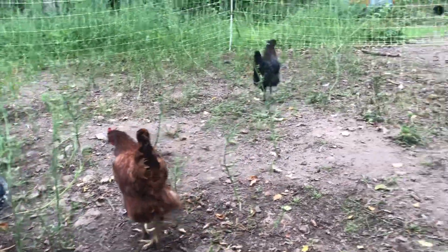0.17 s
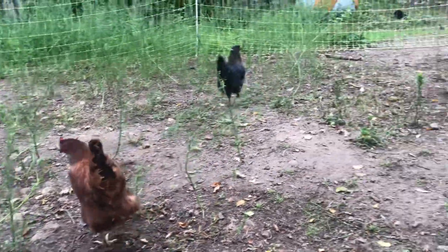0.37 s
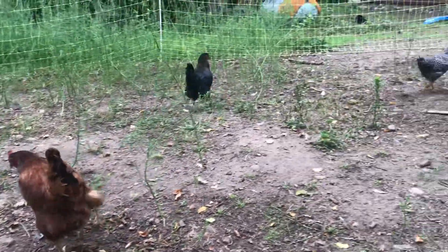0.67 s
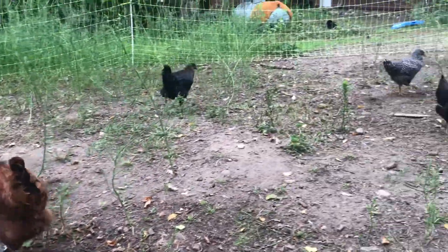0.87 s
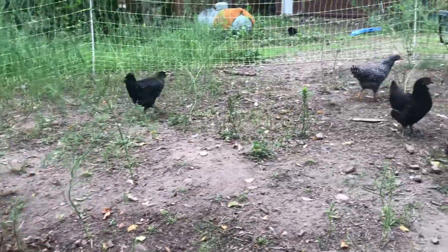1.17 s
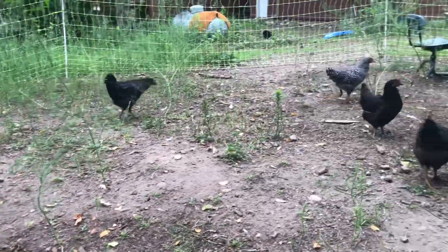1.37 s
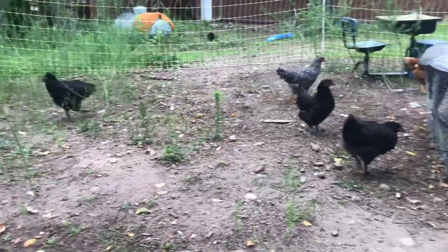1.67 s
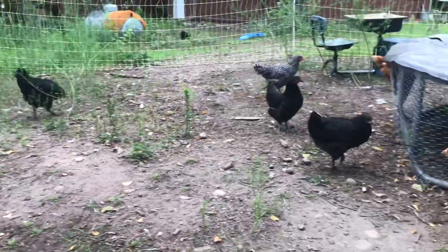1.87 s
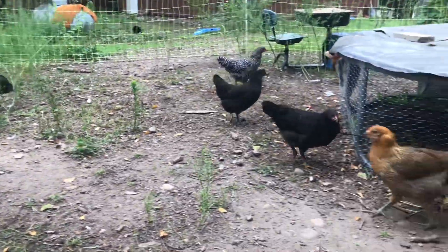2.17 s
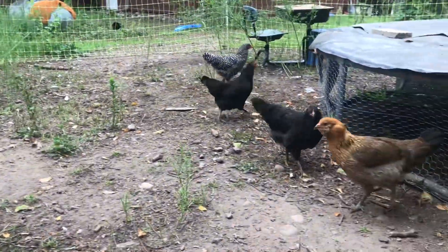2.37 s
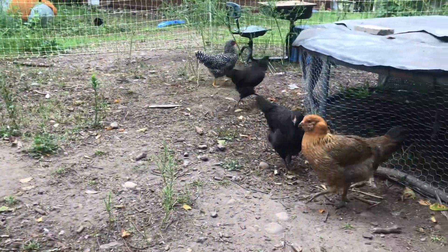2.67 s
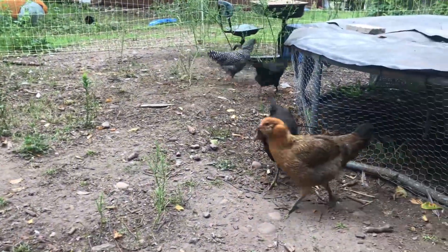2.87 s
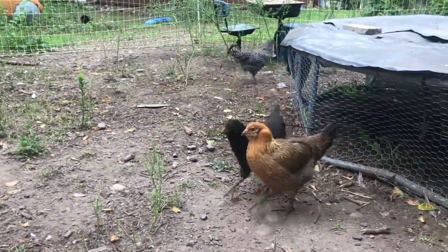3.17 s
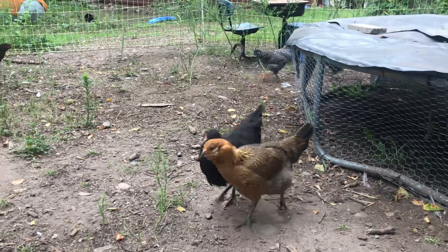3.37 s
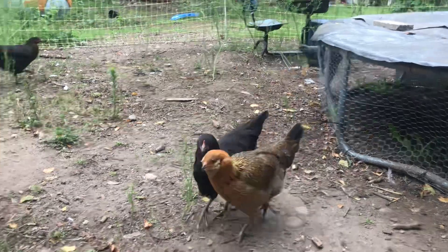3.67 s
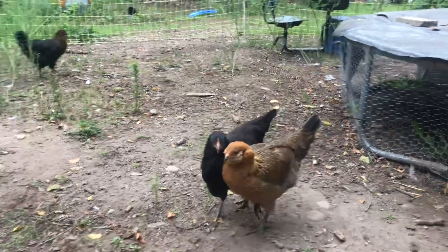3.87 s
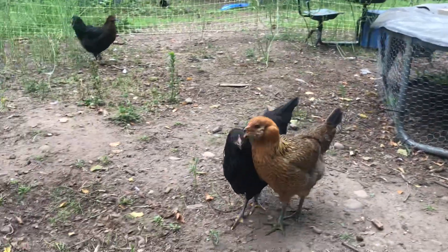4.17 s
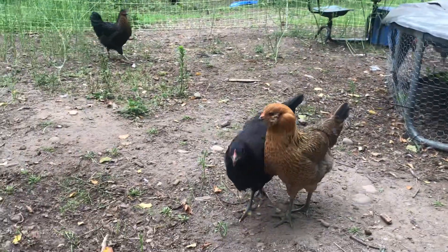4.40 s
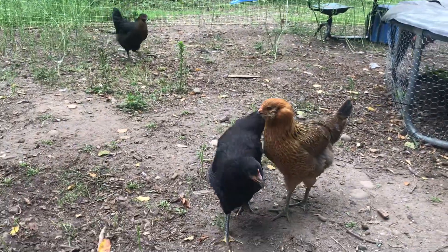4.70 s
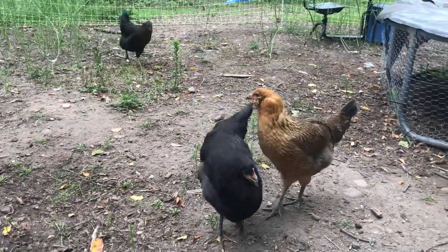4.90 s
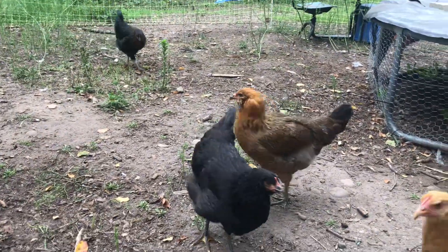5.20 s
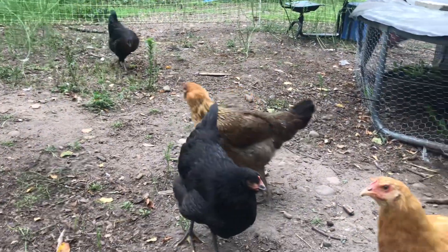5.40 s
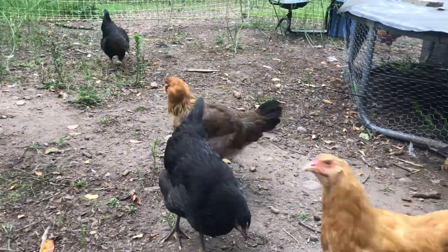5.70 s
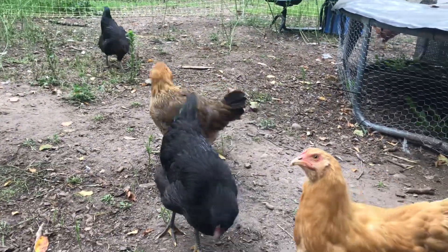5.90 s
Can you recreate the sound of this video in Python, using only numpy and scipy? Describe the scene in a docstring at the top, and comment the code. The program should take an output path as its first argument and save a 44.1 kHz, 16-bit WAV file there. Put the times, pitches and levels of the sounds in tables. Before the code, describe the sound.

Backyard chickens mutter, cluck and whine a few metres away over soft wind rumble and faint motor buzz, with one strong low handling thump.

```python
"""Hens in a backyard run

Hens cluck in short gliding notes and draw out three long whining calls, a few metres from a phone: voiced partials
shaped by throat and mouth resonances, plus a rasp of throat air and a short echo. The hand bumps the phone's case
with low falling thumps. Shaped noise gives wind rumble, flock murmur and microphone hiss; a far motor rattles,
hums and whistles, and one small bird chirps in sliding sines."""
import sys
import numpy as np
from scipy import signal
from scipy.fft import rfft, irfft
from scipy.io import wavfile
from scipy.ndimage import uniform_filter1d

SR = 44100
rng = np.random.default_rng(int(sys.argv[2]) if len(sys.argv) > 2 else 0)


def pcm_store(signal):
    """Save signal as 16-bit PCM."""
    levels = np.round(np.clip(np.atleast_2d(signal), -1, 1) * 32767)
    wavfile.write(sys.argv[1], SR, levels.astype(np.int16).T)


N = 266716
T = np.arange(N) / SR  # s


def undb(db):
    """Gain of a level in dB."""
    return 10 ** (np.asarray(db) / 20)


def walk(rate, size=N):
    """Slow random drift: levels held for 1 / rate s, smoothed twice; spread near 1."""
    hold = max(int(SR / rate), 1)
    held = np.repeat(rng.standard_normal(size // hold + 1), hold)[:size]
    return 1.3 * uniform_filter1d(uniform_filter1d(held, hold), hold)


def band(lo_hz, hi_hz):
    """Noise between two edges, rms 1."""
    bandpass = signal.butter(4, [lo_hz, hi_hz], "band", fs=SR, output="sos")
    noise = signal.sosfilt(bandpass, rng.standard_normal(N))
    return noise / noise.std()


def sine(hz):
    """Sine that follows a pitch curve in Hz."""
    return np.sin(2 * np.pi * np.cumsum(hz) / SR)


def resonance_db(hz, centre_hz, width_hz, skirt_db):
    """Gain of a resonance: 0 dB at the centre, falling away on both sides."""
    return -skirt_db * np.log10(1 + ((hz - centre_hz) / width_hz) ** 2)


def syrinx(hz, gains, jitter, flutter_db):
    """Nearly pure partials on a pitch that trembles a little, with an uneven airflow."""
    trembling_hz = hz * (1 + jitter * walk(250, size=len(hz)))
    phase = 2 * np.pi * np.cumsum(trembling_hz) / SR
    flow = undb(flutter_db * walk(110, size=len(hz)))
    return flow * sum(gain * np.sin(k * phase) for k, gain in enumerate(gains, 1))


# short hen notes: t/s, length/ms, start f/Hz, end f/Hz, peak level of the loudest partial/dB, throat resonance f/Hz
CLUCK_NOTES = [(0.13, 204, 507, 480.5, -65, 750), (0.45, 39, 366, 385, -56.5, 750),
               (0.49, 34, 400, 414, -52.5, 697), (0.539, 62, 372, 430, -49, 710),
               (0.612, 38, 427, 386, -50.5, 745), (0.645, 80, 410, 451, -51, 742),
               (0.723, 39, 332, 413, -49.5, 810), (0.759, 48, 404, 412, -41.5, 810),
               (0.797, 74, 447, 457, -48, 778), (0.891, 150, 357, 426, -47, 780.0),
               (0.895, 59, 453, 428, -52.5, 757), (1.099, 27, 604, 557, -64.5, 2060),
               (1.128, 36, 696, 570, -56.5, 1250), (1.138, 18, 356, 352, -46.5, 835),
               (1.165, 22, 342, 328, -52, 726), (1.368, 17, 578, 537, -64, 1400),
               (1.398, 39, 310, 299, -48.5, 473), (1.575, 28.5, 578, 568, -48, 350.0),
               (1.64, 32, 522, 517, -50.5, 200.0), (1.725, 49, 534, 532, -53, 787),
               (1.755, 42, 345, 329, -51.5, 514), (1.795, 39, 553, 475, -56, 755),
               (1.811, 40, 409, 413, -55.5, 704), (1.88, 42, 525, 512, -49.5, 790),
               (1.915, 78, 412.6, 645, -56, 950), (1.925, 60, 480.7, 548, -52, 800.0),
               (1.96, 26, 373, 279, -50.5, 500), (2.001, 24.5, 553, 542, -45.5, 850),
               (2.065, 22.5, 548, 523, -44.5, 820), (2.156, 29.5, 533, 535, -52, 840),
               (2.155, 40, 338, 395, -52.5, 400), (2.19, 49, 570, 361, -50, 880),
               (2.227, 29, 310, 345, -53, 826), (2.318, 48, 310, 303, -47.5, 738),
               (2.415, 35, 560, 467, -54.5, 780), (2.467, 66, 553, 536, -52.5, 798),
               (2.564, 20, 615, 514, -52.5, 980), (2.724, 30, 393, 307, -50, 500.0),
               (2.749, 19, 636, 524, -55, 1340), (2.953, 28, 324, 325, -49.5, 463),
               (3.055, 27, 269.5, 287, -39, 700), (3.387, 47, 327, 333, -46, 582),
               (3.91, 31, 253, 332, -44.5, 511), (3.974, 63, 304, 357, -45.5, 576),
               (4.148, 24.5, 304, 279.7, -39, 751), (4.211, 34, 450, 429, -56.5, 687),
               (4.32, 98, 510, 480, -60.5, 820), (4.572, 50, 468, 330, -50, 565),
               (4.786, 34, 279, 274.5, -39, 880), (4.788, 48, 501, 585, -47.5, 980),
               (5.205, 86, 527, 646, -52.5, 280.0), (5.447, 70, 302.6, 317, -44.5, 525),
               (5.63, 51, 454, 322, -49, 600), (5.772, 32.3, 400, 328, -45.0, 520),
               (5.853, 52, 547, 544, -59, 863), (5.912, 80, 488, 342, -45.5, 517),
               (6.011, 89, 338, 267.6, -49.0, 1005)]
# the throat lifts partials near its resonance; the voice falls off per octave
THROAT_WIDTH_HZ, THROAT_SKIRT_DB, VOICE_DB_PER_OCTAVE = 45.6, 19.5, -6
# a note whose partials miss the resonance is breathier: dB of rasp per dB lost, and the most it gains
RASP_DB, BREATHY_SHARE, BREATHY_MAX_DB = -19.5, .33, 9
FALL_POWER = .42  # falling notes drop early and level out


def clucks():
    """Each note swells, glides and stops; low notes break in from above, hoarse and with a rasp of throat air."""
    voice, air = np.zeros(N + SR), np.zeros(N + SR)
    k = np.arange(1, 5)  # partial numbers
    for s, ms, hz0, hz1, db, throat_hz in CLUCK_NOTES:
        t = np.arange(int(ms * SR / 1000)) / SR
        u = t * 1000 / ms  # 0..1 through the note
        shape = np.clip(2.2 * np.sin(np.pi * u), 0, 1)

        # slack membranes start tight and drop to their pitch within a few cycles
        slack = min(650 / (hz0 + hz1), 1) ** 3
        glide = u ** (FALL_POWER if hz1 < hz0 else 1)
        break_in = 1 + .14 * slack ** 2 * np.exp(-t / .008)
        pitch = (hz0 + (hz1 - hz0) * glide) * break_in

        throat = resonance_db(k * (hz0 + hz1) / 2, throat_hz, THROAT_WIDTH_HZ, THROAT_SKIRT_DB)
        colour = throat + VOICE_DB_PER_OCTAVE * np.log2(k)
        gains = undb(db + colour - colour.max())
        breath_db = min(-BREATHY_SHARE * colour.max(), BREATHY_MAX_DB)

        start = int(s * SR)
        note = slice(start, start + len(t))
        voice[note] += shape * syrinx(pitch, gains, .009 + .014 * slack, 1.8)
        air[note] += shape * (1 + slack) / 2 * undb(db + breath_db)
    return voice[:N] + undb(RASP_DB) * air[:N] * band(300, 1120)


# long hen calls, one list of breakpoints each: t/s, f/Hz, rms level of the first partial/dB
WHINE_CALLS = [
    [(2.46, 689, -64), (2.5, 761, -46), (2.56, 737, -46.5), (2.585, 780, -42), (2.65, 816, -50),
     (2.675, 749, -45.5), (2.73, 740, -43.5), (2.755, 812, -42.5), (2.79, 742, -44.5), (2.915, 759, -42.5),
     (2.935, 795, -43.5), (2.95, 810, -62)],
    [(3.07, 687, -46), (3.15, 710, -44), (3.18, 746, -42.5), (3.21, 570, -42), (3.225, 560, -45.5),
     (3.24, 830, -49)],
    [(4.207, 642, -48), (4.24, 663.5, -50.5), (4.3, 613, -48), (4.39, 664, -43), (4.42, 589, -43.5),
     (4.45, 575, -44), (4.47, 617, -47), (4.52, 588.5, -44), (4.565, 572, -42.5), (4.585, 609, -42),
     (4.655, 608, -37.5), (4.674, 625, -51)],
]
# the overtone rings a mouth resonance, and is muffled until the beak opens BEAK_OPEN_S before the end
MOUTH_HZ, MOUTH_WIDTH_HZ, MOUTH_SKIRT_DB, OVERTONE_DB = 1164, 75, 14, -6.5
BEAK_OPEN_S, BEAK_MOVE_S, BEAK_SHUT_DB = 0.25, 0.023, -11.5


def whines():
    """Long clean calls: two partials with a quick quaver in pitch, the upper one shaped by mouth and beak."""
    out = np.zeros(N)
    for call in WHINE_CALLS:
        s, hz, db = np.transpose(call)
        on = (T >= s[0]) & (T < s[-1])
        t = T[on]
        edge = np.clip(np.minimum(t - s[0], s[-1] - t) / 0.011, 0, 1)  # 11 ms fades
        tune = np.interp(t, s, hz)
        pitch = tune * (1 + .007 * walk(60, size=len(t)))

        shut = np.clip((s[-1] - BEAK_OPEN_S - t) / BEAK_MOVE_S, 0, 1)
        mouth = resonance_db(2 * tune, MOUTH_HZ, MOUTH_WIDTH_HZ, MOUTH_SKIRT_DB)
        overtone_db = OVERTONE_DB + BEAK_SHUT_DB * shut + mouth
        first = np.sqrt(2) * undb(np.interp(t, s, db))  # rms to peak
        gains = [first, first * undb(overtone_db)]
        out[on] += edge * syrinx(pitch, gains, .008, 1.2)
    return out


ECHO_DB = -18


def coop_echo(hens):
    """Scatter from ground and coop: noise from 4 ms on that dies by 60 dB in 0.2 s, smearing the hens."""
    t = T[:SR // 4]
    scatter = rng.standard_normal(len(t)) * np.exp(-np.log(1000) * t / 0.2) * (t > .004)
    echo = signal.fftconvolve(hens, scatter / np.linalg.norm(scatter))[:N]
    return undb(ECHO_DB) * echo


# bumps of the case: t/s, nominal peak level/dB, slowness (stretch of the sweep), direction (sign of the wave)
CASE_BUMPS = [(1.869, -29, 1.35, "pull"), (2.059, -38.5, 1.3, "pull"), (2.1228, -18.7, 1.12, "pull")]
SOFT_POWER = 6  # slower bumps have a softer attack: power of slowness


def thumps():
    """A bump travels through the case: the sharp part arrives first, the deep part late, a falling sweep."""
    out = np.zeros(N)
    for s, db, slow, way in CASE_BUMPS:
        t = np.maximum(T - s, 0) / slow
        cycles = 30 * t + 0.67 * np.log(1 + t / 0.0011)  # falls towards 30 Hz / slow
        attack = np.sin(np.pi / 2 * np.clip(t / (.0007 * slow ** SOFT_POWER), 0, 1)) ** 2
        swell = np.exp(-((t - .011) / .0145) ** 2) * attack
        sign = 1 if way == "push" else -1
        out += sign * undb(db) * swell * np.sin(2 * np.pi * cycles)
    return out


# faint chirps of a small bird: t/s, start f/Hz, end f/Hz, peak level/dB
BIRD_CHIRPS = [(.44, 3800, 3080, -69), (.68, 2180, 2060, -62.5), (.872, 2050, 2180, -66)]
CHIRP_LENGTH_S = 0.028


def songbird():
    """Thin short whistles that slide in pitch."""
    out = 0
    for s, hz0, hz1, db in BIRD_CHIRPS:
        u = np.clip((T - s) / CHIRP_LENGTH_S, 0, 1)
        out = out + undb(db) * np.sin(np.pi * u) * sine(hz0 + (hz1 - hz0) * u)
    return out


# slow fader moves of the motor's low hum: t/s, rms level/dB
HUM_LEVELS = [(2.2, -74), (3, -68.5), (5.4, -67.5), (5.9, -70.5)]
HUM_HZ = 185.2
BUZZ_HZ, BUZZ_DB = 59.15, -74  # strokes per second, rms level
WHISTLE_HZ, WHISTLE_DB = 2900, -84


def motor():
    """A far small motor: a rattle on every stroke, every other one weaker, wavering, a low hum and a thin whistle."""
    turn = np.cumsum(BUZZ_HZ / 2 * (1 + 0.0087 * walk(2.4))) / SR  # two strokes a turn
    stroke = np.exp(-(2 * turn % 1) / 0.56)
    rattle = stroke * np.where(turn % 1 < .5, 1, .6) + 0.098
    buzz = rattle * undb(1.4 * walk(25.12)) * band(2333, 3002)

    hum_gain = np.sqrt(2) * undb(np.interp(T, *np.transpose(HUM_LEVELS)))
    hum = hum_gain * sine(HUM_HZ + 0.987 * walk(1.5))
    whistle = undb(WHISTLE_DB + 2.5 * walk(14)) * sine(WHISTLE_HZ + 8 * walk(5.6))
    return buzz / buzz.std() * undb(BUZZ_DB) + hum + whistle


# tone curve of the yard bed: f/Hz, relative level per Hz/dB
YARD_SPECTRUM = [(20, -14.5), (56, 1.5), (120, -9), (190, -17), (280, -21.5), (440, -25.5), (620, -18),
                 (810, -25), (1300, -35.5), (2100, -36.5), (3400, -43.5), (7700, -49.5), (9500, -49.5),
                 (10500, -53.5), (11600, -49), (15500, -51.5)]
# gusts that ride the wind rumble: t/s, relative level/dB
GUST_LEVELS = [(0, -8.5), (.8, -1.5), (1.1, -4), (1.55, 0.5), (2.4, -1.5), (2.9, -3), (3.7, -5), (4.1, 0.5),
               (4.6, -2.5), (5.2, -2), (6.05, -4.5)]
YARD_DB = -51  # rms of the whole bed


def yard():
    """Half-octave noise bands: the bass heaves with gusts, the middle flickers with the far flock, the hiss is even."""
    f = np.maximum(np.arange(N // 2 + 1) * SR / N, 1)
    hz, db = np.transpose(YARD_SPECTRUM)
    noise = rfft(rng.standard_normal(N)) * undb(np.interp(np.log(f), np.log(hz), db))
    gust = np.interp(T, *np.transpose(GUST_LEVELS))
    out, step = 0, np.log(2) / 2
    for centre in 16 * np.exp(step * np.arange(22)):
        share = np.clip(1 - np.abs(np.log(f / centre)) / step, 0, 1)  # crossfades into its neighbours
        lively = 1 / (1 + (centre / 1200) ** 3)
        heave = gust / (1 + (centre / 110) ** 2)
        flicker = lively * (2.52 * walk(2.92) + 0.8 * walk(12))
        out = out + irfft(noise * share, N) * undb(heave + flicker)
    return out / out.std() * undb(YARD_DB)


def scene():
    """Hens and their echo, the bumps, the small bird and the motor over the yard bed."""
    hens = clucks() + whines()
    return (hens + coop_echo(hens) + thumps() + songbird() + motor() + yard())[None]


TOP_HZ = 15730


def record(dry):
    """The phone cuts the top with a steep low-pass."""
    lowpass = signal.ellip(14, .2, 70, TOP_HZ, fs=SR, output="sos")
    return signal.sosfilt(lowpass, dry)


dry = scene()
out = record(dry)
pcm_store(out)
```